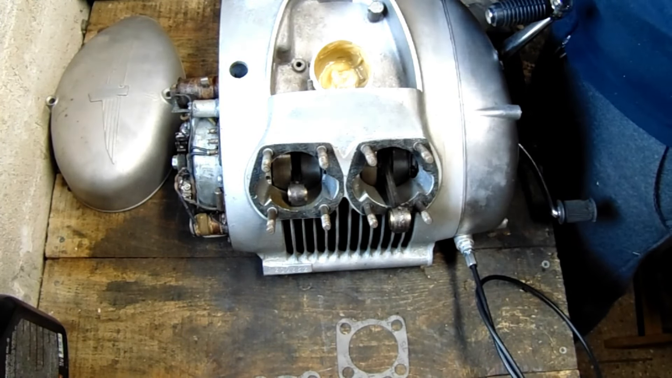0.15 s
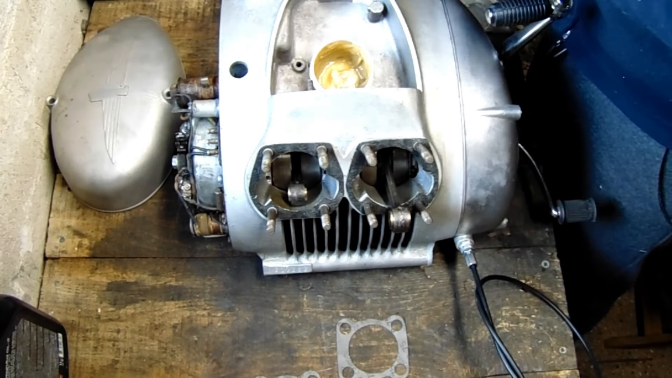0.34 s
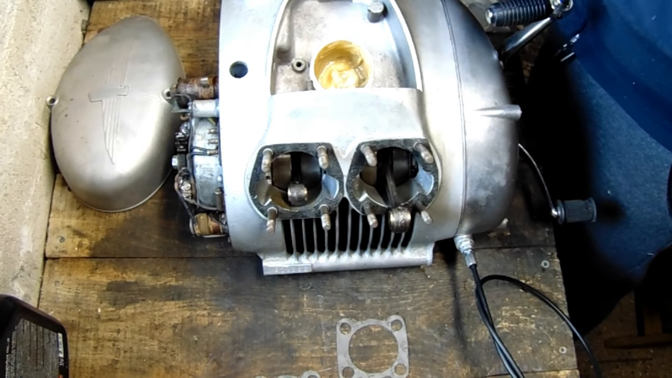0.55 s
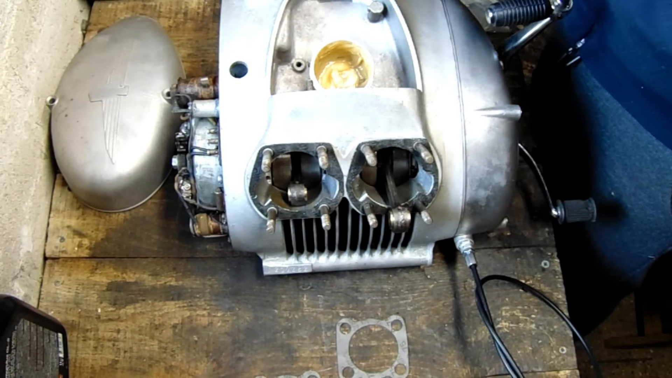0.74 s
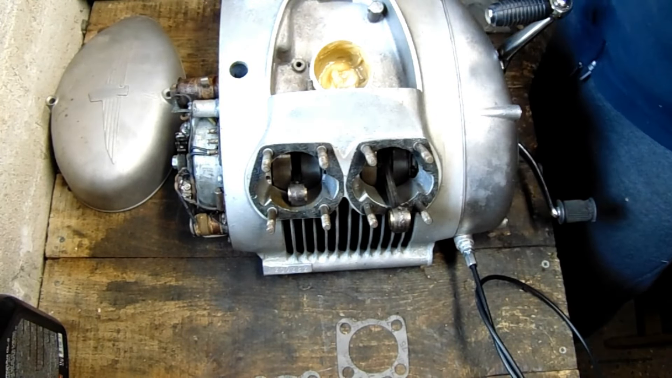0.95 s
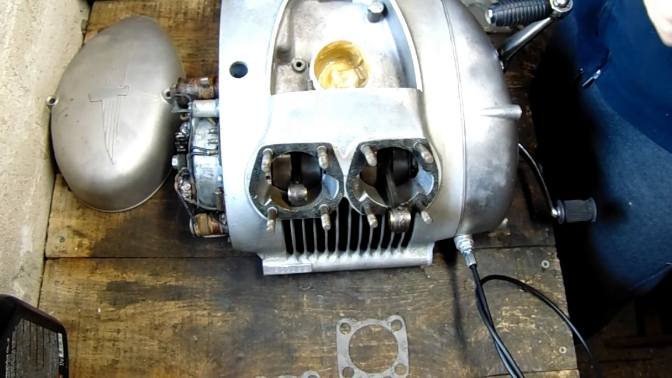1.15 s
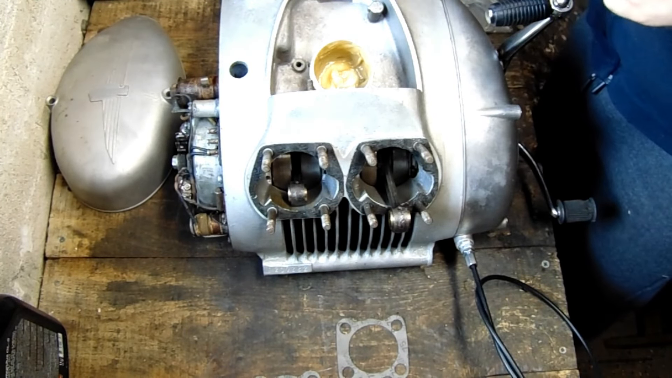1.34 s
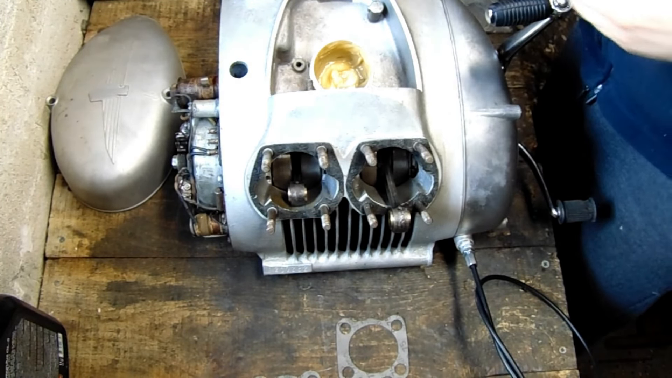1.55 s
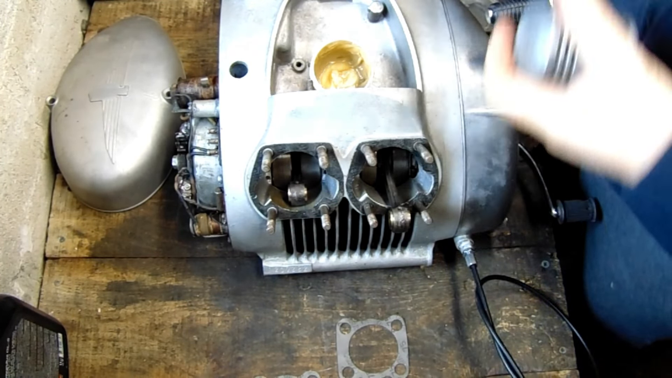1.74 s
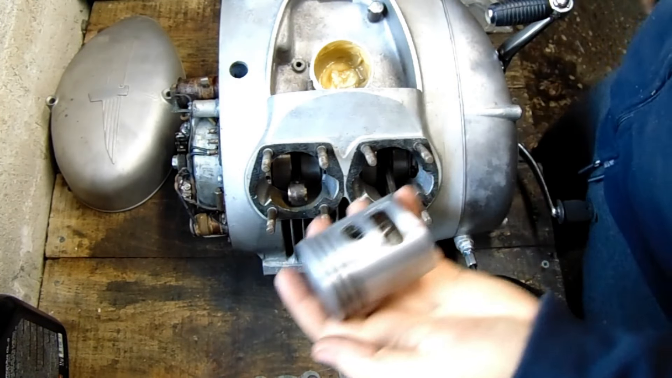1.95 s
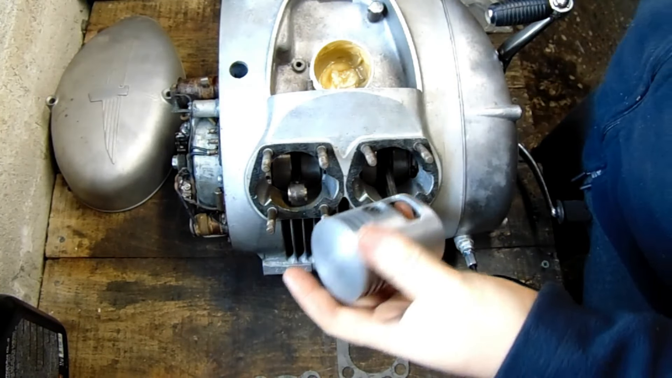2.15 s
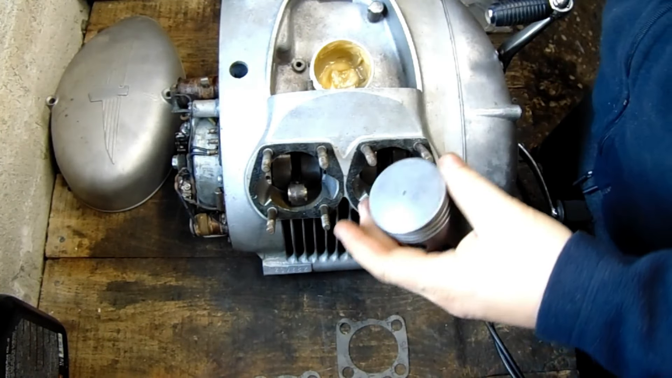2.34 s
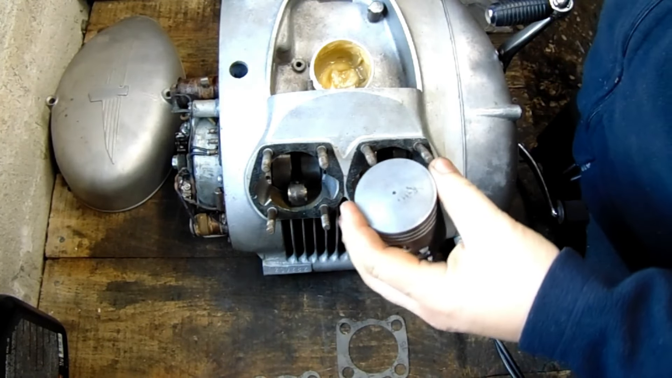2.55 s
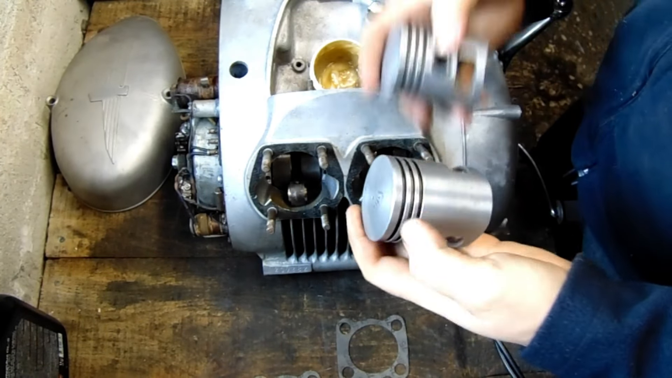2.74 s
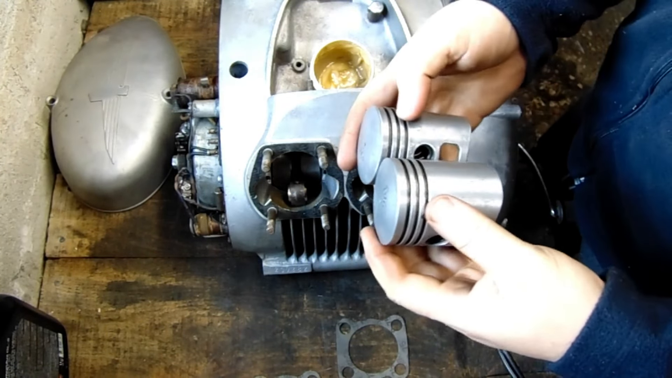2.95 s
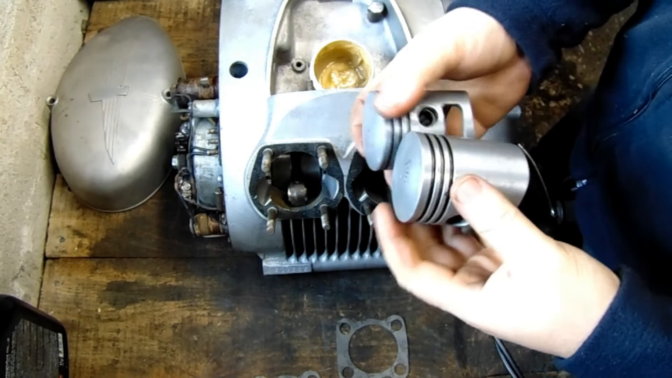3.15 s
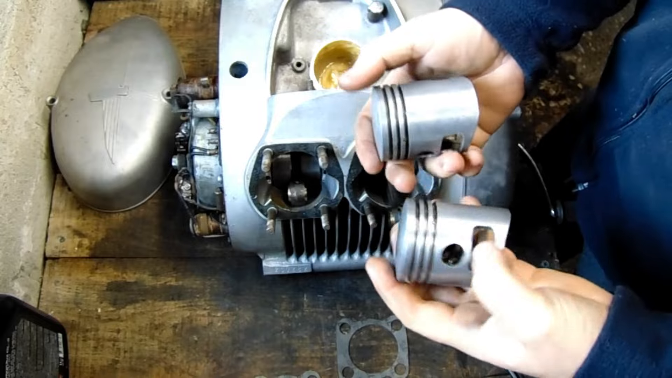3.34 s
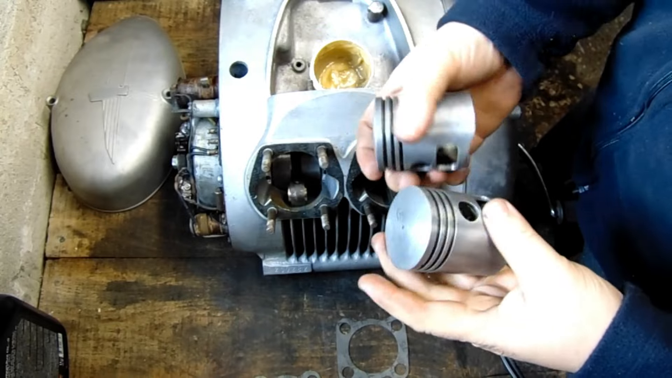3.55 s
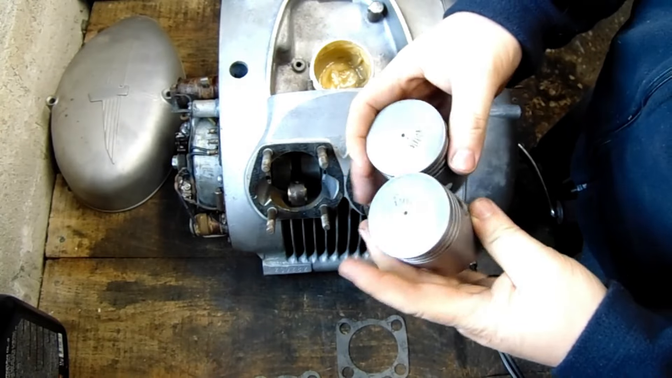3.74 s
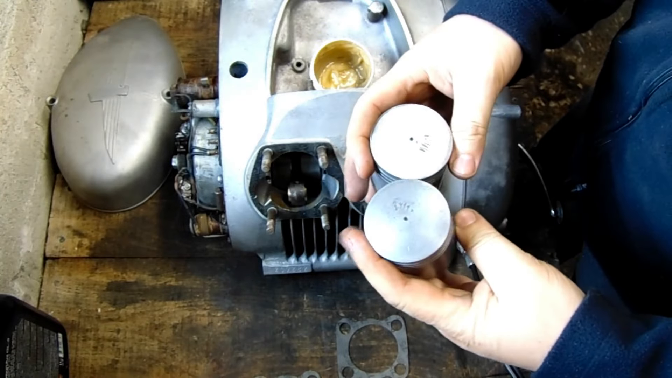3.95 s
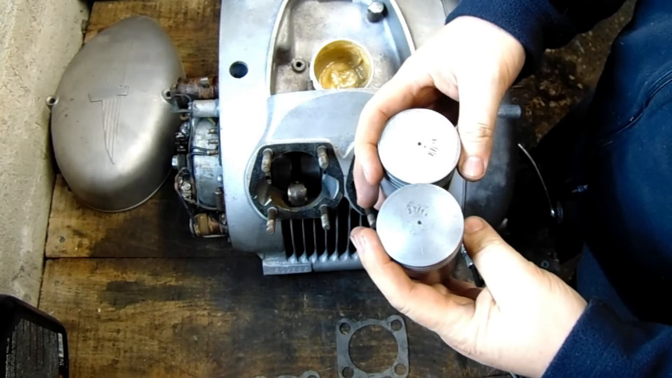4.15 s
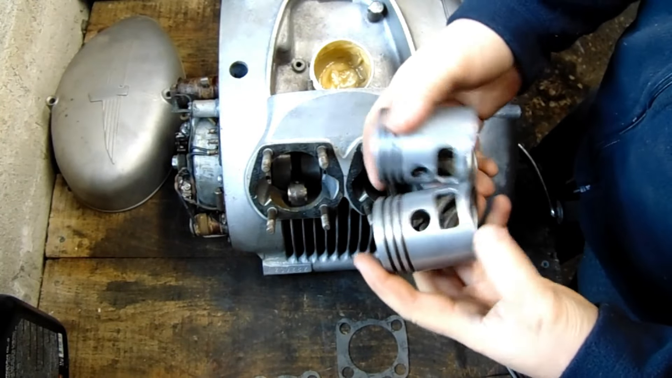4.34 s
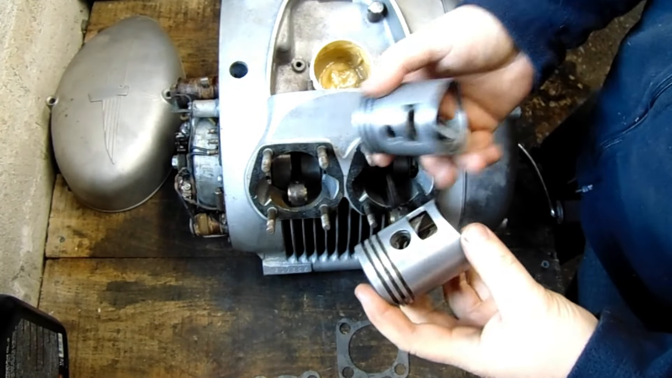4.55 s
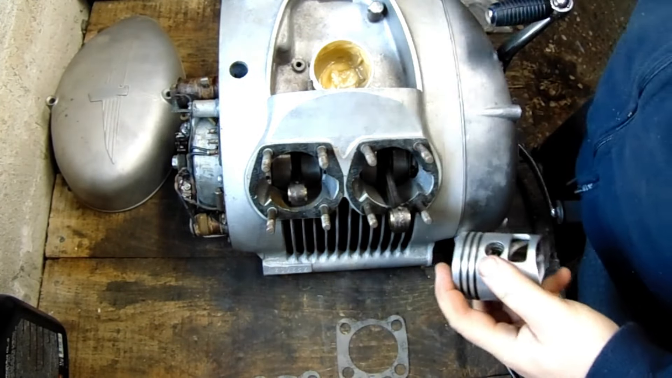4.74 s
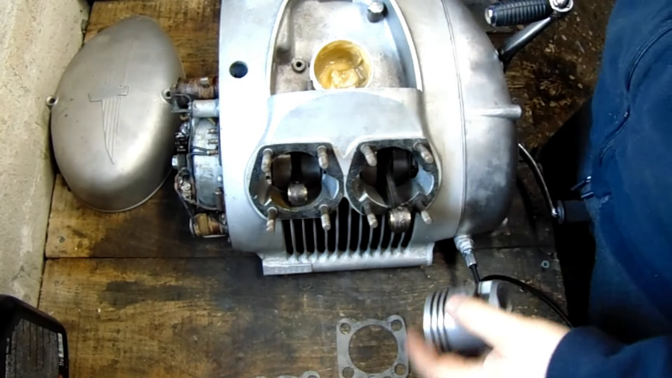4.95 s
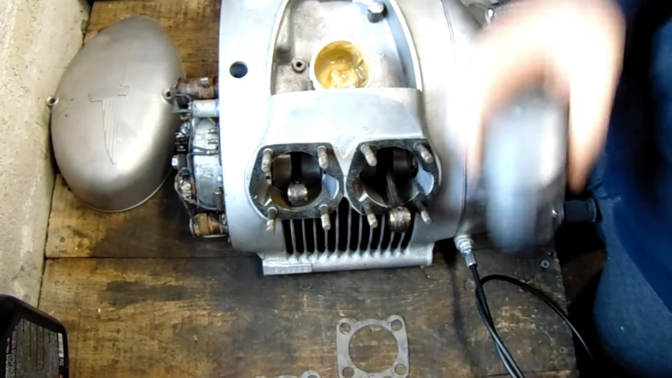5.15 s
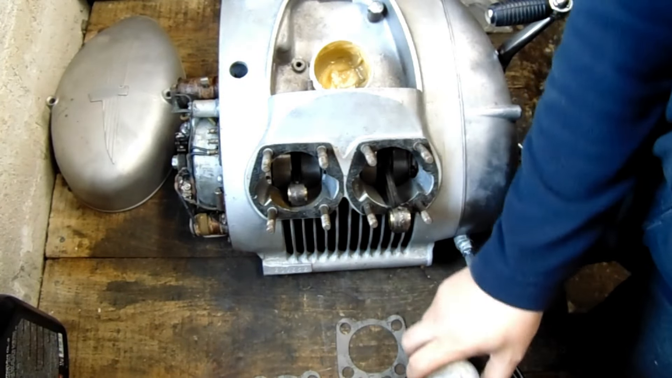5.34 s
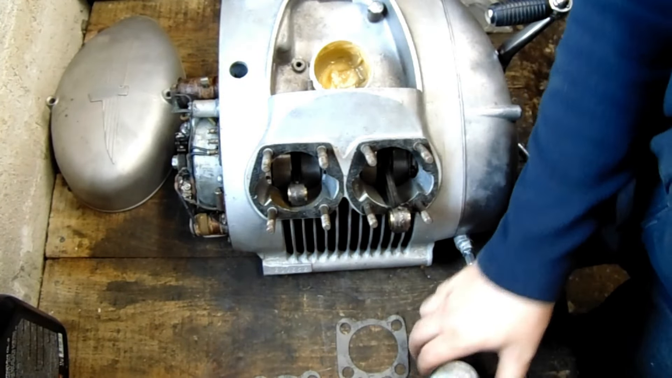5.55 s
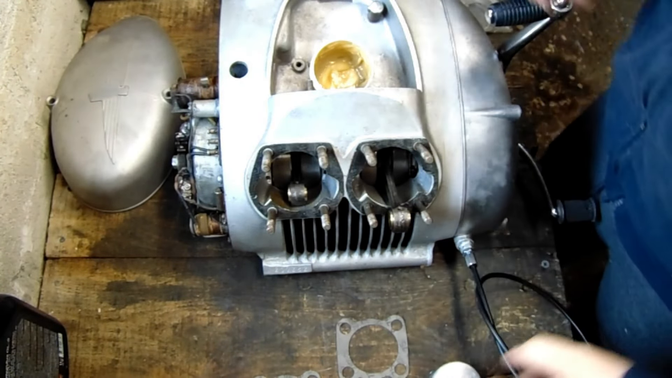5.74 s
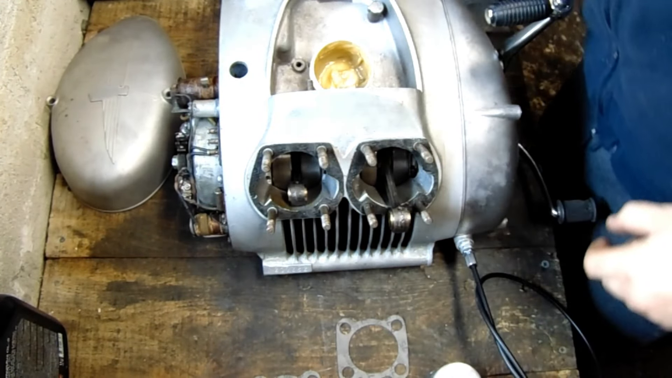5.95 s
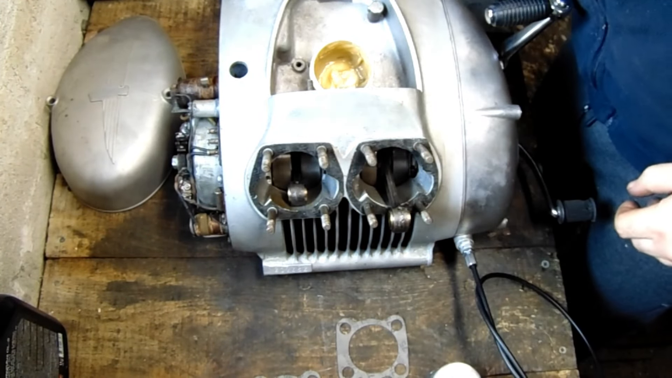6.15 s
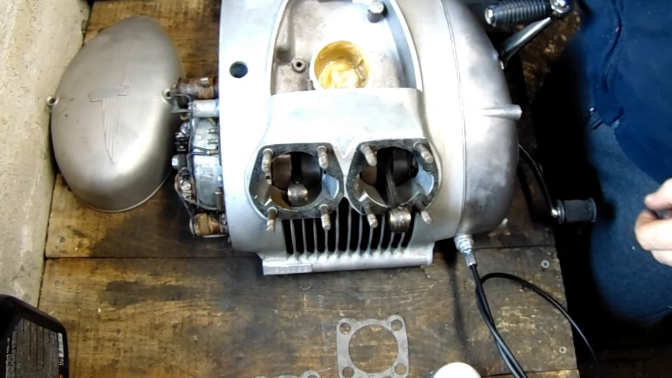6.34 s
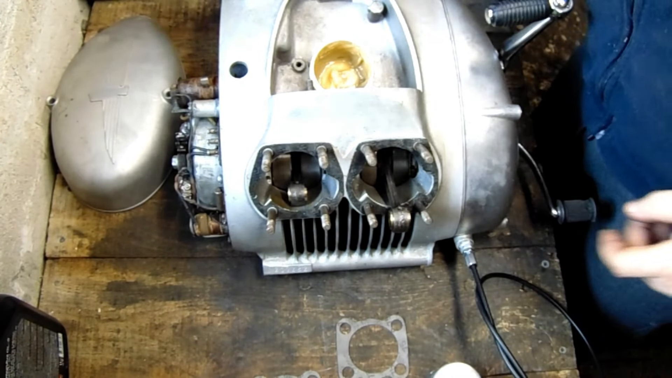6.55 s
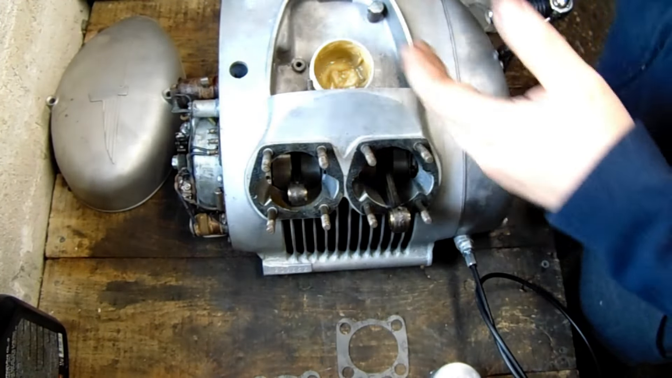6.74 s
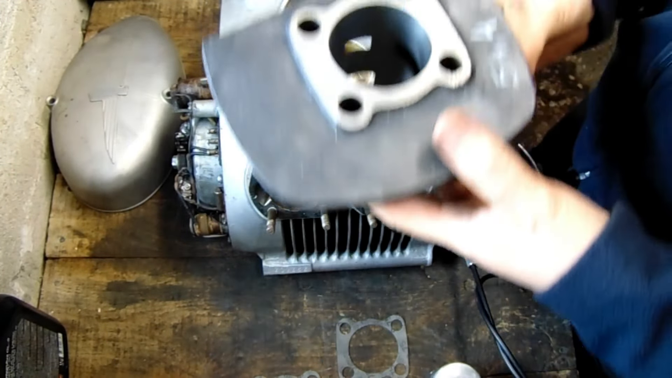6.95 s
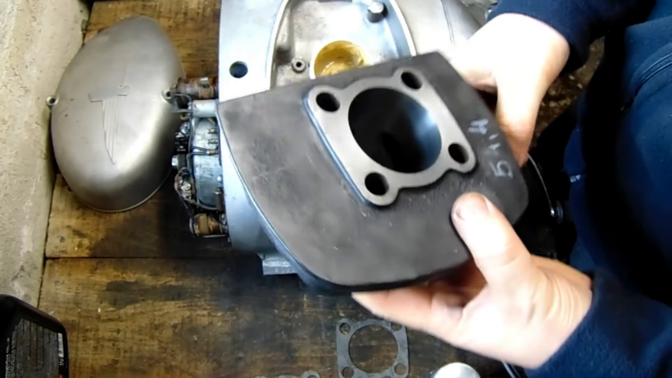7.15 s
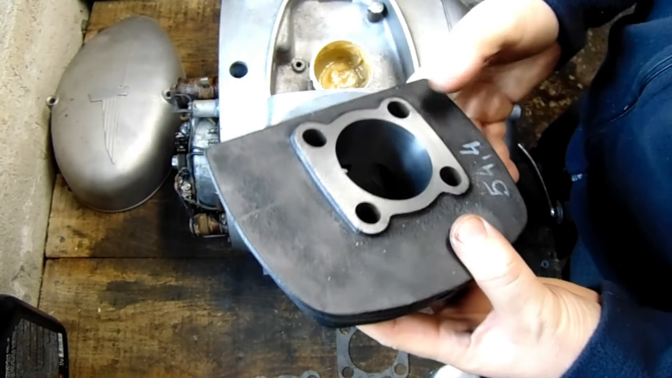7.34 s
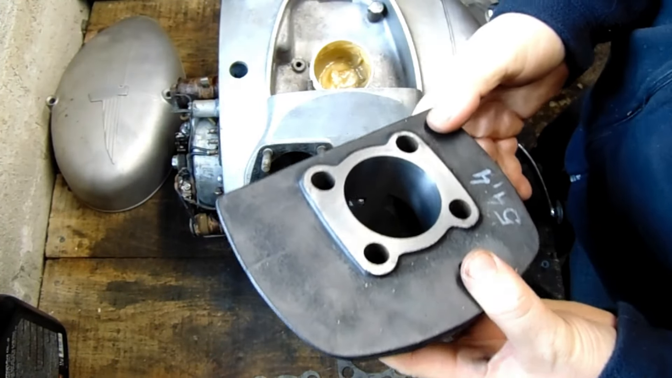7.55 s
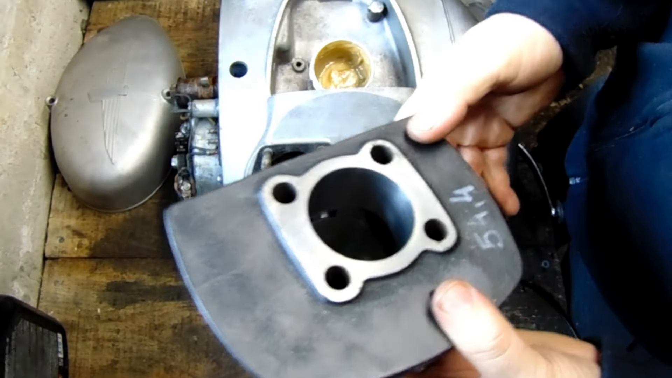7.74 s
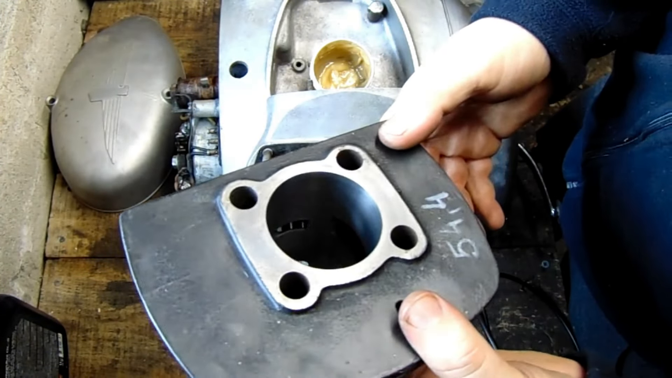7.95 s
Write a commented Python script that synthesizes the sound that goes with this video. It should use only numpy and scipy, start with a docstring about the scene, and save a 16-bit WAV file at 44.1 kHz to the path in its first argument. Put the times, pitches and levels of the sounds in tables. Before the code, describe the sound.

Handled metal engine parts clink, scrape and knock down on a wooden workbench over a faint hum and soft whirs.

```python
"""In a quiet, humming workshop, sleeves rustle and a camera's focus motor gives the first of four whirs.
Small parts tick and bump on a shelf. Fingers turn two aluminium pistons, which clink together and
ring, then tap and scrape side by side. One is set down on a wooden bench, which thuds and rattles.
Last, palms rub an iron cylinder, making its cooling fins sing, and pick it up with a dull bump."""
import sys
import numpy as np
from scipy import signal
from scipy.fft import rfft, irfft, next_fast_len
from scipy.io import wavfile

SR = 44100
rng = np.random.default_rng(int(sys.argv[2]) if len(sys.argv) > 2 else 0)


def transcribe(u):
    """Save the signal u as a 16-bit wav file named by the first command-line argument.

    u: samples, shape (n,) or (channels, n), limited to [-1, 1]; the rate is SR.
    q: integer samples, one column per channel.
    """
    v = np.clip(np.atleast_2d(u).T, -1, 1)
    q = np.round(v * 32767).astype(np.int16)
    wavfile.write(sys.argv[1], SR, q)


N = 352359
T = np.arange(N) / SR
LEAD = SR // 20  # samples kept before each hit
AGE = np.arange(-LEAD, SR // 2) / SR  # seconds since a hit


def amp(db):
    """Turn decibels into a number to multiply by."""
    return 10 ** (np.asarray(db) / 20)

def unit(x):
    """Scale a sound to an average strength (rms) of 1."""
    return x / np.sqrt(np.mean(x ** 2) + 1e-20)

def along(points, hz):
    """Read between (f/Hz, value) points, spacing pitch by octaves."""
    f, v = np.transpose(points)
    return np.interp(np.log(hz + 1), np.log(f + 1), v)

def filtered(x, response):
    """Turn each frequency up or down by response(hz)."""
    size = next_fast_len(len(x) + 8192)
    return irfft(rfft(x, size) * response(np.fft.rfftfreq(size, 1 / SR)), size)[:len(x)]

def shaped(x, tone):
    """Give a sound a tone, drawn as (f/Hz, level/dB) points."""
    return filtered(x, lambda hz: amp(along(tone, hz)))

def noise(tone, size=len(AGE)):
    """Noise with this tone, one hit long unless a size is given."""
    return unit(shaped(rng.standard_normal(size), tone))

def resonate(x, peaks):
    """An object boosts its own pitches: (f/Hz, width/Hz, level/dB)."""
    def response(f):
        return sum((-1) ** k * amp(db) * 1j * f * width / (hz * hz - f * f + 1j * f * width)
                   for k, (hz, width, db) in enumerate(peaks))
    return unit(filtered(x, response))

def crowded(x, depth_db):
    """Cast metal has many weak, overlapping notes that make its tone uneven."""
    grid_hz = np.arange(0, SR / 2, 70)
    ripple = depth_db * np.tanh(rng.standard_normal(len(grid_hz)))
    return unit(filtered(x, lambda hz: amp(np.interp(hz, grid_hz, ripple))))

def friction(slips_per_s, depth_db):
    """Rubbing: noise whose strength jumps with every tiny slip."""
    slips = np.interp(T * slips_per_s, np.arange(N), rng.standard_normal(N))
    return unit(rng.standard_normal(N) * amp(depth_db * slips))

def gates(rows, edge_s):
    """Fade in and out for each (t/s, length/s, level/dB) movement."""
    return sum(amp(db) * np.clip(np.minimum(T - s, s + length - T) / edge_s + .5, 0, 1)
               for s, length, db in rows)

def strike(fade_s, swell_db, swell_s):
    """Each hit swells in briefly, peaks, then fades. A fade time is the time to drop 60 dB."""
    swell = amp(swell_db) * np.clip(1 + AGE / swell_s, 0, 1) ** 1.5
    return np.where(AGE < 0, swell, np.exp(-np.log(1000) * np.abs(AGE) / fade_s))

def ringing(notes, swell_db, spread_db):
    """Struck metal rings; the grip shifts each note's strength and pitch a little."""
    draws = rng.standard_normal((len(notes), 3))
    return sum(amp(db + spread_db * louder) * strike(fade, swell_db, 0.029)
               * np.sin(2 * np.pi * (hz * (1 + 0.00182 * higher) * AGE + phase))
               for (hz, db, fade), (louder, higher, phase) in zip(notes, draws))

def pushed(notes):
    """One push starts a board's notes from rest."""
    return sum(amp(db) * (AGE > 0) * strike(fade, 0, .01) * np.sin(2 * np.pi * hz * AGE)
               for hz, db, fade in notes)

def soften(x, cutoff_hz):
    """A softer hit makes less sound above the cutoff."""
    return filtered(x, lambda hz: 1 / np.sqrt(1 + (hz / cutoff_hz) ** 4))

def add(track, s, x):
    """Place a hit so that it lands at s seconds."""
    start = round(s * SR) - LEAD
    track[start:start + len(x)] += x[:N - start]


# tone of the hiss: f/Hz, level/dB
HISS_TONE = [(15, -42), (25, 0), (43, -16), (76, -4.5), (169, -9.5), (311, -11.5), (385, -12.5), (501, -13),
             (1170, -16.5), (2340, -19.5), (4540, -22), (10600, -25.5), (11800, -26.5), (14200, -27.5)]
# loudness of the hum: t/s, level/dB
HUM_LEVELS = [(0, -73), (4.7, -78.5), (5.0, -64), (5.7, -69.5), (8, -69)]

def workshop():
    """A hiss that dips briefly at one clink, and a low, wavering hum."""
    hiss = shaped(noise(HISS_TONE, N), [(14100, 0.5), (14500, -15)])
    dip_s, hold_s, return_s = 3.88, 0.18, 0.81
    dip = (T > dip_s) * np.clip(1 - (T - dip_s - hold_s) / return_s, 0, 1)
    rumble = resonate(rng.standard_normal(N), [(70.8, 12, 0)])
    hum = resonate(rumble, [(74.7, 4.8, 0)])
    return amp(-63.5 - 5 * dip) * hiss + amp(np.interp(T, *np.transpose(HUM_LEVELS))) * hum


# arm movements: t/s, length/s, level/dB
STROKES = [(0.047, 0.11, -57), (0.226, 0.171, -58), (0.485, 0.12, -57.5), (0.644, 0.105, -56.5),
           (0.773, 0.069, -59), (0.895, 0.044, -55.5), (0.956, 0.082, -56)]
# tone of cloth: f/Hz, level/dB
CLOTH_TONE = [(120, -36), (200, 3.5), (253, -24), (454, 1), (497, 0.5), (665, 1.5), (1510, -1), (1620, 2),
              (2800, -3), (13200, -5.5), (15500, -26)]

def sleeves():
    """Cloth catches quickly, trails off and keeps stirring between strokes."""
    rise_s, fall_s = 0.019, 0.061
    first, last = STROKES[0][0], STROKES[-1][0]
    motion = gates([(first, last - first, -68.5)], 0.26)
    for s, length, db in STROKES:
        edges = np.minimum((T - s) / rise_s, (s + length - T) / fall_s)
        motion = np.maximum(motion, amp(db + 1) * np.clip(edges + .5, 0, 1))
    return motion * unit(shaped(friction(370, 1.5), CLOTH_TONE))


# motor runs: start/s, turn/s, stop/s
MOTOR_RUNS = [(0.246, 0.478, .585), (2.513, 2.672, 2.84), (4.872, 4.967, 5.24), (7.796, 7.878, 7.94)]
# notes of its case: f/Hz, width/Hz, level/dB
CASE_NOTES = [(199, 24, -2), (307, 20.6, 0), (443, 36, 0), (659, 117, -2), (908, 41, 2), (1220, 66, 1.5),
              (1736, 51, -7), (2180, 135, -13)]

def focus_motor():
    """The motor chatters in its plastic case, pauses and turns back with a click."""
    pause_s, drop_db_per_s = 0.011, 12  # longer runs are gentler
    drive = np.zeros(N)
    for start, turn, stop in MOTOR_RUNS:
        legs = [(start, turn - pause_s - start), (turn, stop - turn)]
        drive += gates([(s, length, -53 - drop_db_per_s * length) for s, length in legs], 0.011)
        add(drive, turn, amp(-47.5) * strike(0.015, -24, .002))
    chatter = resonate(friction(250, 3.1), CASE_NOTES)
    return drive * unit(filtered(chatter, lambda hz: 1 / (1 + (hz / 2600) ** 4)))


# light touches: t/s, level/dB, snap fade/s, ring f/Hz
TICKS = [(.742, -55.5, .04, 670), (1.254, -45.5, 0.054, 4300), (1.265, -49, 0.094, 6040),
         (1.342, -55, 0.093, 11800), (1.543, -59.5, .05, 575), (2.536, -52, .06, 7500),
         (2.541, -43.5, 0.025, 502), (6.422, -55, .08, 4680), (6.444, -46, 0.16, 3100),
         (6.447, -47, 0.048, 5900), (6.506, -48.5, .09, 4890), (6.522, -46, 0.081, 3150),
         (6.545, -51, 0.041, 2960), (6.618, -57.5, .07, 1393), (6.743, -62, 0.029, 7700),
         (6.996, -57, 0.096, 7860), (7.656, -54.5, 0.034, 10700)]
# tone of a touch on metal: f/Hz, level/dB
TOUCH_TONE = [(200, -19), (600, -3.5), (1500, -5), (4400, -7), (6500, -12.5), (12000, -9), (14000, -10),
              (14600, -31.5)]
# close notes of a small part: pitch ratio, level/dB, fade at 2500 Hz/s
PART_NOTES = [(1, 0, .1), (1.045, -5, .07), (.93, -7, .06), (1.12, -9, .05)]

def ticks():
    """Small parts touch: low ones give soft taps, high ones mostly snap."""
    out = np.zeros(N)
    for s, db, fade, ring_hz in TICKS:
        snap = strike(fade, -1.1, 0.19 * fade) * crowded(noise(TOUCH_TONE), depth_db=9.5)
        stretch = (2500 / ring_hz) ** 0.34  # low notes last longer
        notes = [(ring_hz * ratio, note_db, life * stretch) for ratio, note_db, life in PART_NOTES]
        ring = ringing(notes, swell_db=-17, spread_db=3.5)
        octaves = np.log2(ring_hz / 2800)
        snap_db, ring_db = 2.5 * min(octaves, 0), -1.5 * max(octaves, 0)
        add(out, s, amp(db) * (amp(snap_db) * snap + amp(ring_db) * ring))
    return out


# bumps on the shelf: t/s, level/dB, cutoff/Hz
BUMPS = [(1.269, -42.5, 112), (1.289, -45, 105), (6.438, -32.5, 593), (6.4467, -21.5, 484),
         (6.455, -27.5, 400), (6.507, -38.5, 454), (6.528, -42.5, 880)]
# notes of the shelf: f/Hz, level/dB, fade/s
SHELF_NOTES = [(98, -8, 0.18), (133, 1, 0.03), (250, -18, 0.13), (325, 3.5, 0.093), (460, -11, 0.077),
               (607, -11.5, 0.11), (910, -24, 0.13)]
# tone of knocked wood: f/Hz, level/dB
WOOD_TONE = [(53, -24), (90, -39.5), (363, 0), (615, -1), (938, -4.5), (1090, -14), (1210, -7),
             (2180, -31.5), (3620, -17.5), (4480, -53), (5890, -22), (14000, -42.5)]

def shelf_bumps():
    """Heavy parts bump a hollow shelf as they are picked up."""
    out = np.zeros(N)
    for s, db, cutoff_hz in BUMPS:
        shuffle = amp(-9) * strike(0.084, -9.5, 0.044) * noise(WOOD_TONE)
        add(out, s, amp(db) * soften(pushed(SHELF_NOTES) + shuffle, cutoff_hz))
    return filtered(out, lambda hz: (1j * hz / (1j * hz + 35)) ** 2)  # trim the deepest bass


# turns of the pistons: t/s, length/s, level/dB
TURNS = [(1.51, 0.07, -70), (2.68, .057, -64.5), (3.32, 0.13, -70), (3.665, 0.051, -68.5),
         (4.347, 0.026, -52.5), (4.47, 0.071, -63)]

def fingertips():
    """Sliding fingertips stir only a piston's high notes."""
    notes = [(4660, 100, -11), (7070, 140, -8), (8300, 460, -12), (11700, 110, -2), (13300, 130, -10)]
    return gates(TURNS, 0.015) * resonate(friction(150, 6.4), notes)


# notes of a hand-held piston: f/Hz, level/dB, fade/s
PISTON_NOTES = [(1450, -9, .055), (1820, -14, .06), (2490, -9, .055), (2655, -9, .06), (3020, -10, .055),
                (3430, -9, .065), (3890, -16, .06), (4365, -10, .05), (4587, 0, .07), (4668, -6, .055),
                (5680, -14, .05), (6580, -10, .05), (7288, -3, .06), (7400, -3, .06), (7530, -8, .05),
                (7850, -10, .05), (11400, -15, .05), (11820, 0, .06), (13055, -5, .055), (13228, -6, .05),
                (15700, -20, .05)]
# tone of its clack: f/Hz, level/dB
CLACK_TONE = [(100, -33), (500, -13), (1100, -8.5), (1450, -0.5), (2400, 3), (3300, 0.5), (4500, 0.5),
              (5300, -13.5), (7700, -1), (9500, -15), (12500, -4), (14000, -3), (14600, -48)]

def piston_hit(tone, swell_db):
    """Piston meets piston: a sharp crack, a clack and a ring cut short by the fingers."""
    crack = amp(-1) * strike(.02, -20, .004) * noise(CLACK_TONE)
    clack = amp(2) * strike(.055, swell_db + 4, .024) * crowded(noise(CLACK_TONE), depth_db=5)
    ring = amp(-4.5) * ringing(PISTON_NOTES, swell_db, spread_db=6.5)
    return shaped(ring + crack + clack, tone)


# free clinks: t/s, level/dB, brightness/dB
CLINKS = [(1.8133, -56.5, 7), (3.0119, -27.5, 9), (3.0634, -28.5, 0.5), (3.8819, -24, -6.5)]
# tone of a clink: f/Hz, level/dB, change/dB per dB of brightness
CLINK_TONE = [(4124, 0, 0), (4575, 8.5, -1.23), (4800, 8.5, -1.15), (5310, 4, -0.23), (8800, -0.5, 0.78),
              (11000, -1.5, 0.8)]

def clinks():
    """The spot where the pistons meet decides which notes ring most."""
    out = np.zeros(N)
    for s, db, bright_db in CLINKS:
        tone = [(hz, base_db + change * bright_db) for hz, base_db, change in CLINK_TONE]
        add(out, s, amp(db) * piston_hit(tone, swell_db=-10))
    return out


# side-by-side taps: t/s, clack level/dB, ring level/dB
TAPS = [(4.0088, -50.5, -64), (4.1168, -52, -57), (4.1823, -50.5, -64), (4.341, -43, -49.5),
        (4.3807, -46, -45), (4.435, -42, -41), (4.4745, -66, -50)]

def gripped_taps():
    """Pistons tap while pressed together; the grip mutes the notes around their 7 kHz ring."""
    out = np.zeros(N)
    for s, clack_db, ring_db in TAPS:
        muted_db = ring_db - 13.5
        tone = [(3500, clack_db), (4500, muted_db), (6300, muted_db), (7350, ring_db), (9500, muted_db)]
        add(out, s, piston_hit(tone, swell_db=-19.5))
    return out


# scrapes: t/s, length/s, level/dB
SCRAPES = [(4.341, 0.032, -43), (4.384, .034, -46)]
# notes of a piston's side wall: f/Hz, width/Hz, level/dB
WALL_NOTES = [(1630, 370, 2), (2300, 650, -0.5), (3120, 180, -1.5), (4460, 490, -8), (7480, 120, -7),
              (8360, 260, -12), (12200, 66, -20), (12900, 700, -23.5)]

def scrapes():
    """One piston's side catches and slips along the other's."""
    return gates(SCRAPES, 0.02) * crowded(resonate(friction(500, 2.7), WALL_NOTES), depth_db=13.5)


# hits on the bench: t/s, level/dB, cutoff/Hz
KNOCKS = [(5.548, -44.5, 2385), (5.5938, -8.5, 2700), (5.796, -46, 296), (5.904, -52.5, 293)]
# the board giving under the piston: f/Hz, level/dB, fade/s
BOARD_NOTE = [(466, 1.5, 0.018)]
# notes of the bench with an engine on it: f/Hz, level/dB, fade/s
BENCH_NOTES = [(105, -9, .2), (150, -8, .08), (220, -5, .08), (376, 2, .06), (500, -7, .04),
               (598, -21, .42), (662, -7, .14), (813, -25, .3), (853, -10, .08), (953, -15, .16),
               (1092, -9, .11), (1316, -18, .1), (1410, -24, .12), (1723, -23, .18), (2040, -24, .17),
               (2250, -27, .14)]

def bench_knocks():
    """The piston's hard rim clicks down; the bench thuds and rings, and loose parts rattle."""
    rattle_tone = [(100, -7), (600, 15), (1100, -2), (2000, 3), (3200, -8), (6000, -40)]
    rim_tone = [(500, 1.5), (4000, 0), (8000, -10.5), (13000, -13.5), (14600, -31)]
    ring = amp(-9) * pushed(BENCH_NOTES)
    out = np.zeros(N)
    for s, db, cutoff_hz in KNOCKS:
        thud = pushed(BOARD_NOTE) + amp(-3) * strike(.026, -16, .02) * noise(WOOD_TONE)
        rattle = amp(-16.5) * strike(0.12, -1, 0.024) * noise(rattle_tone)
        rim = amp(-28.5) * strike(0.065, -13.5, 0.038) * noise(rim_tone)
        add(out, s, amp(db) * (soften(ring + thud + rattle, cutoff_hz) + rim))
    bass_cut = signal.butter(4, 84, "highpass", fs=SR, output="sos")  # a board gives off little deep bass
    return signal.sosfilt(bass_cut, out)


# rubs on iron: t/s, length/s, level/dB, fin f/Hz, upper f/Hz
PALM_RUBS = [(6.147, 0.027, -64, 3120, 9040), (6.183, 0.096, -69, 2610, 13620),
             (7.0, 0.038, -70.5, 3180, 8100), (7.249, 0.048, -65.5, 2750, 6150)]

def palms():
    """Skin rubs the cylinder; each rub makes one cooling fin sing two notes."""
    out = np.zeros(N)
    skin = filtered(friction(200, 2.7), lambda hz: amp(along(TOUCH_TONE, hz)) * hz / (hz + 1500))
    skin = crowded(skin, depth_db=3.5)
    for s, length, db, hz, upper_hz in PALM_RUBS:
        # uneven rubbing blurs the pitch
        drift = np.cumsum(rng.standard_normal(N)) * np.sqrt(80 / SR / (2 * np.pi))
        fin = np.sin(2 * np.pi * (hz * T + drift)) + amp(-8) * np.sin(2 * np.pi * (upper_hz * T + drift))
        out += gates([(s, length, db)], 0.023) * (skin + amp(5) * unit(fin))
    return out


# how long the room echoes: f/Hz, fade/s
ROOM_FADES = [(100, 0.19), (700, 0.27), (2000, 0.36), (10000, 0.1)]

def room(x):
    """A short echo whose highest pitches die first."""
    hz, t, spectrum = signal.stft(rng.standard_normal(SR // 2), SR, nperseg=256)
    fading = np.exp(-np.log(1000) * t / along(ROOM_FADES, hz)[:, None])
    tail = signal.istft(spectrum * fading, SR, nperseg=256)[1]
    return signal.fftconvolve(x, tail / np.linalg.norm(tail))[:N]

def scene():
    """Everything is close by, with very little echo."""
    metal = clinks() + gripped_taps() + scrapes() + fingertips()
    wood = bench_knocks() + shelf_bumps()
    echo = room(amp(-33.5) * metal + amp(-22.5) * wood)
    return (metal + wood + echo + sleeves() + palms() + ticks() + focus_motor() + workshop())[None]

def record(dry):
    """Cut off the very highest pitches."""
    return filtered(dry[0], lambda hz: hz < 15800)[None]


dry = scene()
out = record(dry)
transcribe(out)
```